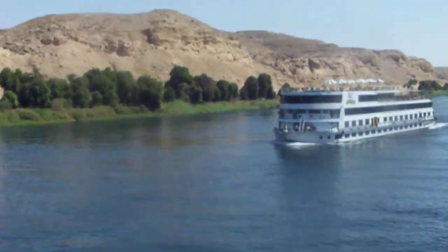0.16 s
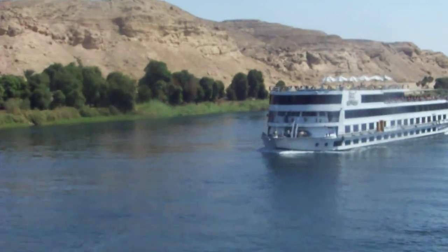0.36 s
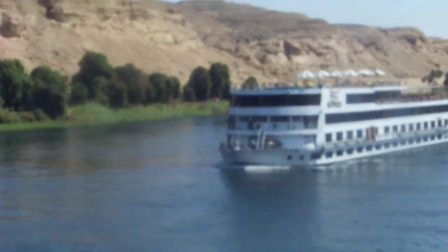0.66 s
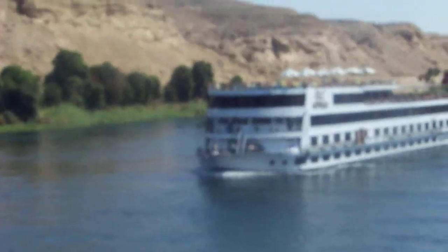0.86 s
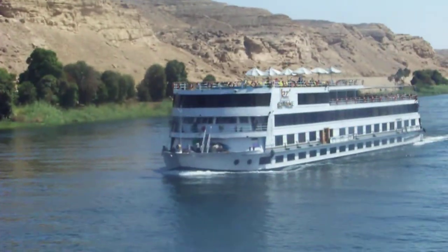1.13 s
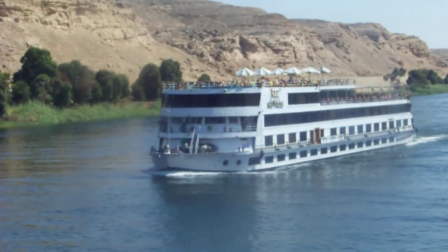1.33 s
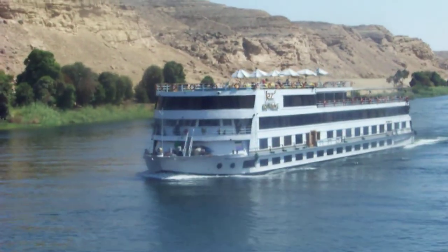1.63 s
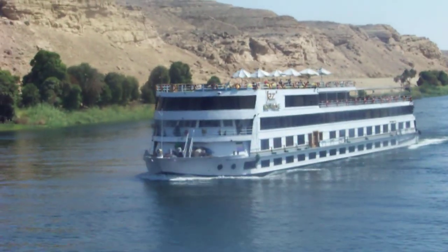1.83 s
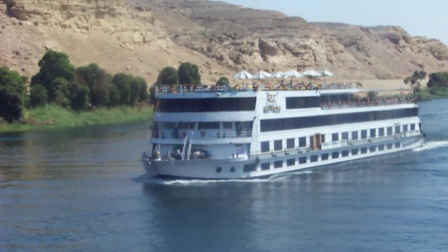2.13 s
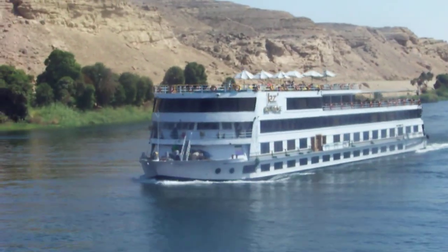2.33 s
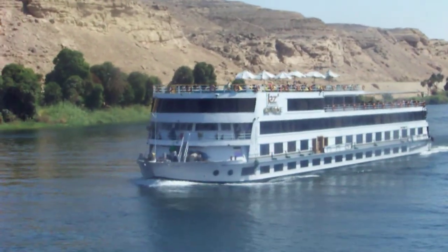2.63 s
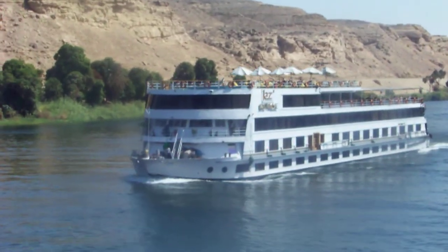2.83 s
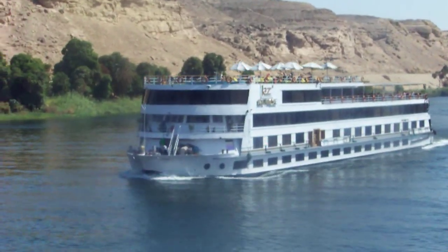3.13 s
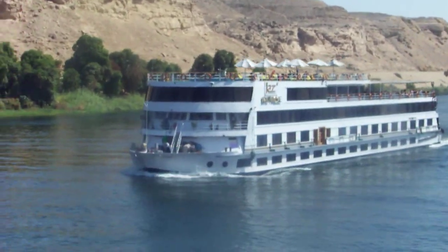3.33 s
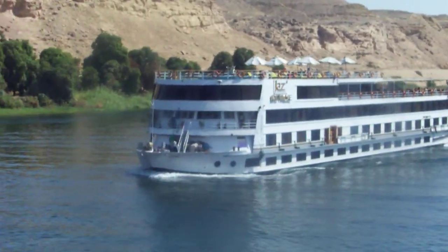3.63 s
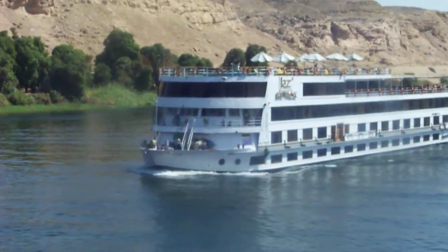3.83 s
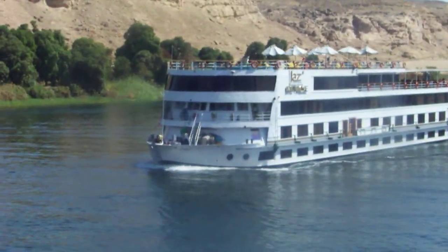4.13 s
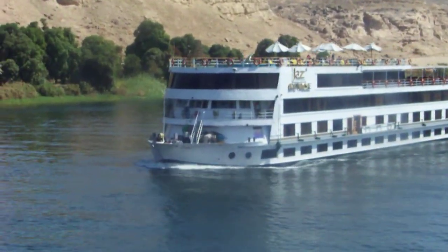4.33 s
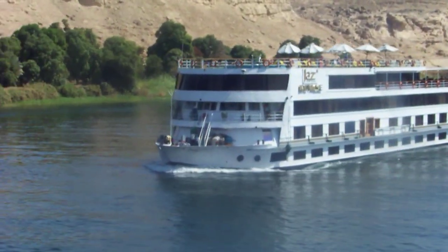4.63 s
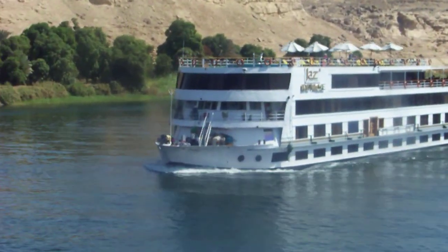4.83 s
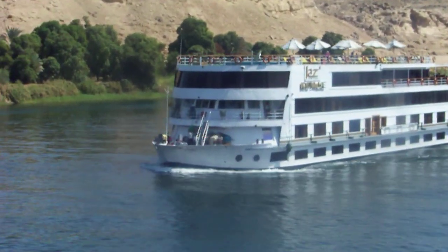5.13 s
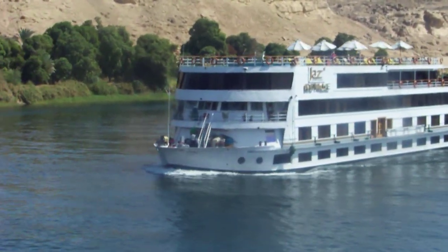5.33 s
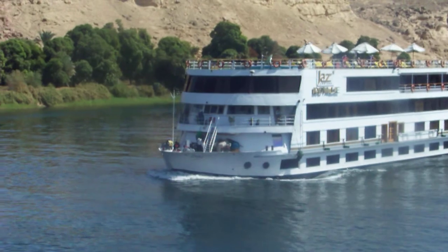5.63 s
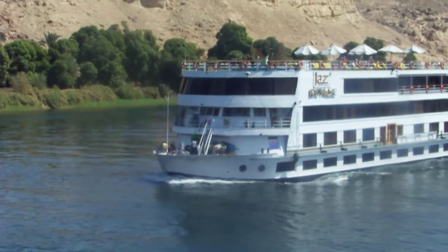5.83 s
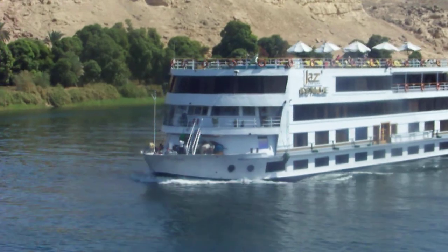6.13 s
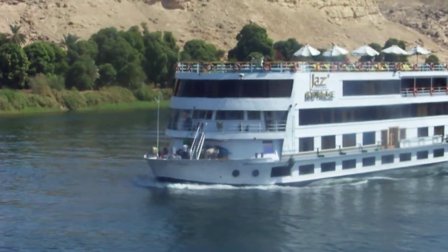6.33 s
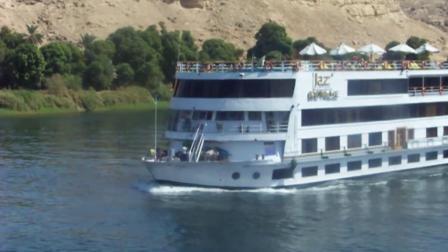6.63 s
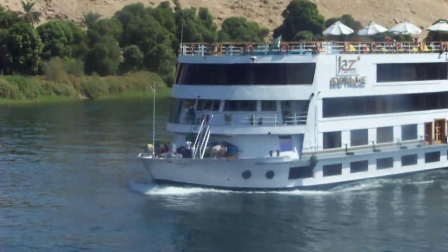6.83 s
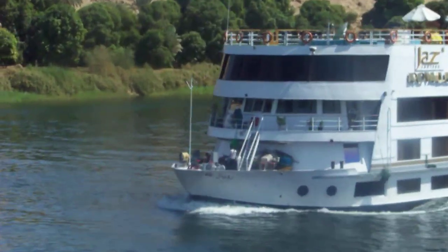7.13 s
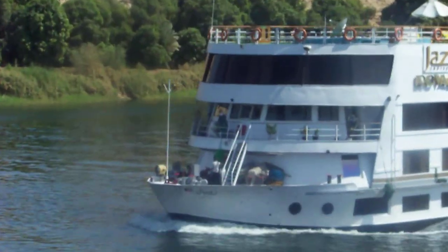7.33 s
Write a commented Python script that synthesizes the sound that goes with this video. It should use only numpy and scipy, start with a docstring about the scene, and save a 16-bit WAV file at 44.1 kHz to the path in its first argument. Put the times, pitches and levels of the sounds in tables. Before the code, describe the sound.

On the deck of a moving river boat, an unbroken rush of wake water and foam hiss covers a low engine rumble. Thin machinery whines swell and fade. About a third of the way in, the deck gives one dull thump with weaker knocks after it, then a soft wind buffet. The water slowly grows stronger and brighter. The handheld stereo microphone adds a few tiny clicks.

```python
"""A steady stereo rush of wake water and foam runs throughout, over a low engine rumble and faint machinery whines.
Shaped noise makes the water, its foam, the breaking waves and the drone; drifting sines make the hum and whines.
A near surface colours the rush with a delayed copy, whose comb climbs as the microphone turns.
A drone builds as another boat draws near. The deck thumps, with three weaker blows close behind, as ringing modes;
wind puffs on the microphone as short bass swells; its case ticks in the hand as tiny bright snaps."""
import sys
import numpy as np
from scipy import signal
from scipy.fft import rfft, irfft, next_fast_len
from scipy.io import wavfile
from scipy.ndimage import uniform_filter1d, map_coordinates

SR = 44100
rng = np.random.default_rng(int(sys.argv[2]) if len(sys.argv) > 2 else 0)


def unload_audio(sound):
    """Save the sound as a 16-bit wav file, at the path given as the first command line argument."""
    columns = np.transpose(np.atleast_2d(sound))
    # keep every value between -1 and 1, then stretch to whole-number steps
    steps = np.round(np.clip(columns, -1, 1) * 32767)
    wavfile.write(sys.argv[1], SR, steps.astype(np.int16))


N = 329868


def amp(db):
    """Decibels to gain."""
    return 10 ** (np.asarray(db) / 20)


def unit(x):
    """Scale to rms 1, over both channels together if there are two."""
    return x / np.sqrt(np.mean(x ** 2) + 1e-20)


def along(rows, hz):
    """Each column of a table, read on a log-frequency axis."""
    table_hz, *columns = np.transpose(rows)
    return np.array([np.interp(np.log(hz + 1), np.log(table_hz + 1), column) for column in columns])


def curves(rows):
    """One value per sample for each column after the time."""
    table_s, *columns = np.transpose(rows)
    return [np.interp(np.arange(N) / SR, table_s, column) for column in columns]


def wobble(rate):
    """A smooth random curve, rate knots a second."""
    knots = rng.standard_normal(int(N * rate / SR) + 4)
    return map_coordinates(knots, [np.arange(N) * rate / SR])


def filtered(x, response):
    """x shaped by a response of frequency."""
    padded = next_fast_len(N + SR // 2)
    spectrum = rfft(x, padded) * response(np.fft.rfftfreq(padded, 1 / SR))
    return irfft(spectrum, padded)[..., :N]


def lowpass(hz, edge_hz, order):
    """Gain of a smooth low-pass; around a shifted zero it becomes a band."""
    return 1 / np.sqrt(1 + (hz / edge_hz) ** (2 * order))


def since(s):
    """Seconds since the moment s, zero before it."""
    return np.maximum(np.arange(N) / SR - s, 0)


def bump(s, half_length_s):
    """A bell-shaped swell and ebb centred on the moment s."""
    return np.exp(-((since(0) - s) / half_length_s) ** 2)


def panned(db, pan_db):
    """Left and right gains whose levels differ by pan_db, left louder if positive."""
    return amp([[db + pan_db / 2], [db - pan_db / 2]])


def drift(db_per_s):
    """A steady change of level in dB, zero halfway through."""
    return db_per_s * (since(0) - N / SR / 2)


def tone(hz, width_hz):
    """An unsteady tone near rms 1 whose phase wanders faster with more width."""
    phase = 2 * np.pi * hz * since(0) + 0.75 * wobble(2 * width_hz)
    return np.sqrt(2) * np.sin(phase)


# how the two microphone ports agree: pitch_hz [Hz], likeness [0-1], left_lead_rad [radians]
PORT_LIKENESS = [(50, .99, -.7), (250, .97, -.3), (550, .96, -.1), (1100, .81, -.4), (1400, .6, -1.3),
                 (1700, .35, -1.4), (1950, .31, .2), (2350, .6, 1.6), (3000, .2, 1.1), (3500, .32, -1.1),
                 (4300, .28, -.3), (5400, .2, -1.4), (5900, .15, -3.9), (6800, .39, -3.6)]


def at_ports(pair):
    """Two unrelated noises become left and right, partly alike and shifted in phase."""
    def mixing(hz):
        alike, _ = along(PORT_LIKENESS, hz)
        turn = np.arccos(np.clip(alike, 0, 1)) / 2
        return np.array([np.cos(turn), np.sin(turn)])

    def phase_lead(hz):
        _, lead = along(PORT_LIKENESS, hz)
        return np.exp(.5j * np.outer([1, -1], lead))

    mid, side = filtered(pair, mixing)
    return filtered(np.array([mid + side, mid - side]), phase_lead)


# colour of the engine rumble, its shape only: pitch_hz [Hz], level_db [dB per Hz]
RUMBLE_COLOUR = [(12, -40.5), (25, -8.5), (45, -1), (75, 1.5), (97, -4), (125, -0.5), (170, -3), (230, -9),
                 (400, -34.5), (900, -100)]
# engine tones: pitch_hz [Hz], level_db [dB rms], width_hz [Hz]
ENGINE_TONES = [(81.2, -48.5, 5), (115.5, -51.5, 3.7)]
# rumble level halfway through (dB), and its slow rise as the other boat draws near (dB per s)
RUMBLE_DB, RUMBLE_RISE_DB_PER_S = -38, 0.18


def engines():
    """Engines running evenly through the hull: a bed of low noise and a few humming tones."""
    noise = at_ports(rng.standard_normal((2, N)))
    rumble = unit(filtered(noise, lambda hz: amp(along(RUMBLE_COLOUR, hz))))
    hum = sum(amp(db) * tone(hz, width_hz) for hz, db, width_hz in ENGINE_TONES)
    return rumble * amp(RUMBLE_DB + drift(RUMBLE_RISE_DB_PER_S)) + hum


# machinery whines by name: pitch_hz [Hz], width_hz [Hz], roughness [0-1],
# rest_db [dB, halfway through], drift_db_per_s [dB per s]
WHINE_VOICES = {"low": (717, 10, .2, -53, -1.05), "middle": (1017, 8, 0.35, -53, 1.5),
                "high": (1388, 5, 0.04, -54.5, 0)}
# the wind carries one whine closer: centre_s [s], whine [name], rise_db [dB], half_length_s [s]
WHINE_SWELLS = [(.45, "low", 7.5, 0.75), (1.45, "low", 7, 0.25), (1.82, "low", 12, 0.21),
                (3.42, "high", 11, 0.44), (4.13, "low", 11.5, 0.24), (4.15, "middle", 9, 0.25),
                (5.26, "middle", 9, 0.28), (5.55, "low", 8.5, 0.5), (7.1, "high", 10.5, 0.36)]


def machinery():
    """Thin whines, part tone and part narrow noise flutter, that swell now and then on the wind."""
    out = np.zeros(N)
    for name, (hz, width_hz, rough, rest_db, db_per_s) in WHINE_VOICES.items():
        flutter = unit(filtered(rng.standard_normal(N), lambda f: lowpass(f - hz, width_hz, order=3)))
        share = np.clip(rough, 0, 1)
        whine_sound = np.sqrt(1 - share) * tone(hz, width_hz) + np.sqrt(share) * flutter
        swell_db = sum(db * bump(s, length) for s, whine, db, length in WHINE_SWELLS if whine == name)
        level_db = rest_db + drift(db_per_s) + swell_db + .8 * wobble(10)
        out += amp(level_db) * whine_sound
    return out


# strength of the wake at the deck, used relative to its mean: time_s [s], level_db [dB]
WAKE_FLOW = [(0.05, -34), (0.48, -33.5), (1.05, -34), (1.85, -34), (2.25, -34.5), (2.69, -33), (3.63, -33),
             (3.92, -31.5), (4.22, -32), (4.6, -33), (5.27, -31.5), (5.9, -32.5), (6.35, -32), (6.7, -31),
             (7.15, -31.5), (7.4, -32)]


def flow():
    """How far the wake's strength lies above its mean, in dB; it drives rush, hiss and drone."""
    db, = curves(WAKE_FLOW)
    return db - db.mean()


# level at mean flow, halfway through (dB); growth with the flow (dB per dB)
DRONE_DB, DRONE_GROWS = -46.5, 1.4
# steady build as the other boat draws near (dB per s)
DRONE_RISE_DB_PER_S = 1.13


def drone(centre_hz, width_hz):
    """One broad resonance of the churning water, following the flow and slowly growing."""
    band = filtered(rng.standard_normal(N), lambda hz: lowpass(hz - centre_hz, width_hz / 2, order=2))
    return unit(band) * amp(DRONE_DB + DRONE_GROWS * flow() + drift(DRONE_RISE_DB_PER_S))


# puffs of wind on the ports: centre_s [s], level_db [dB], pitch_hz [Hz], half_length_s [s]
WIND_PUFFS = [(2.957, -28.5, 52, .026), (3.031, -32, 58, .016), (3.08, -39, 80, .025)]
# broken air around a puff: level against the puff (dB), upper edge (Hz), length over the puff's
EDDY_DB, EDDY_HZ, EDDY_STRETCH = -13, 130, 2.4


def puffs():
    """An eddy crosses the ports: a soft swell of a few slow cycles inside a longer patch of broken air."""
    out = np.zeros(N)
    air_band = lambda f: lowpass(f, EDDY_HZ, order=4) * (1 - lowpass(f, 25, order=3))
    for s, db, hz, length in WIND_PUFFS:
        swell = bump(s, length) * np.sin(2 * np.pi * hz * (since(0) - s))
        air = unit(filtered(rng.standard_normal(N), air_band))
        out += amp(db) * (swell + amp(EDDY_DB) * air * bump(s, EDDY_STRETCH * length))
    return out


# ticks of the case: start_s [s], level_db [dB], centre_hz [Hz], spread [octaves],
# crack_db and push_db [dB against the tick], pan_db [dB, left over right]
CASE_TICKS = [(0.6452, -13, 2950, 0.62, -14, -3, 12), (0.646, -20, 2000, .5, -10, -14, -2),
              (1.1194, -27, 7260, .5, -5, 2, -7), (4.505, -28, 5000, .8, -2, 6, 5),
              (6.2368, -25, 6900, .8, -2, 5, 2), (6.2581, -18.5, 6900, 1.0, -3, 13, -1),
              (6.2617, -29, 6000, 1.3, 0, 7, 0)]
# modes of the case: pitch_hz [Hz], level_db [dB], t60 [s]
CASE_MODES = [(1900, -4, 0.007), (2890, 1, 0.011), (4130, -2, 0.0044), (5700, -14, 0.005),
              (7300, -2, 0.0059)]
# half length of a tick's push (s)
PUSH_S = .000036


def ticks():
    """Tiny snaps of plastic: a sharp push, short case modes near the snap's own pitch, and a faint crack."""
    out = np.zeros((2, N))
    for s, db, centre_hz, spread, crack_db, push_db, pan_db in CASE_TICKS:
        t = since(s)
        ring = np.zeros(N)
        for k, (hz, level, t60) in enumerate(CASE_MODES):
            stirred = np.exp(-(np.log2(hz / centre_hz) / spread) ** 2)
            ring += (-1) ** k * stirred * amp(level - 60 * t / t60) * np.sin(2 * np.pi * hz * t)
        grit = unit(filtered(rng.standard_normal(N), lambda f: lowpass(f, 1.9 * centre_hz, order=3)))
        crack = grit * amp(crack_db - 60 * t / 0.011)
        snap = (ring + crack) * (1 - np.exp(-t / 0.0001))
        push = amp(push_db) * bump(s + .0004, PUSH_S)
        out += panned(db, pan_db) * (snap - push)
    # so small a part radiates no bass
    return filtered(out, lambda hz: 1 - lowpass(hz, 900, order=3))


# blows on the deck: start_s [s], level_db [dB], contact_softness_hz [cut-off, Hz]
DECK_BLOWS = [(2.275, -14, 225), (2.368, -30, 200), (2.43, -29.5, 600), (2.49, -34, 180)]
# modes of the deck: pitch_hz [Hz], level_db [dB], t60 [s]
DECK_MODES = [(48.6, -2.5, 0.22), (81.4, -9, 0.22), (111, 1, 0.071), (136.2, -7, 0.29), (185, -8.5, 0.14),
              (217, -9, .09), (490, 8, .08)]
# the shudder after a blow: level against the blow (dB), centre and width (Hz), t60 (s)
SHUDDER_DB, SHUDDER_HZ, SHUDDER_WIDTH_HZ, SHUDDER_T60_S = -16.5, 125, 110, 0.72


def thumps():
    """Blows ring the deck and leave it shuddering; a soft contact stirs only low modes, a hard one also knocks."""
    out = np.zeros(N)
    shudder_band = lambda hz: lowpass(hz - SHUDDER_HZ, SHUDDER_WIDTH_HZ / 2, order=4)
    for s, db, soft_hz in DECK_BLOWS:
        t = since(s)
        ring = np.zeros(N)
        # neighbouring modes move in opposite directions, so the boom builds over a few milliseconds
        for k, (hz, level, t60) in enumerate(DECK_MODES):
            ring += (-1) ** k * amp(level - 60 * t / t60) * np.sin(2 * np.pi * hz * t)
        shudder = unit(filtered(rng.standard_normal(N), shudder_band))
        boom = ring + shudder * amp(SHUDDER_DB - 60 * t / SHUDDER_T60_S)
        onset = 1 - np.exp(-t / 0.0015)
        contact = lambda hz: lowpass(hz, soft_hz, order=6) * (1 - lowpass(hz, 22, order=3))
        out += amp(db) * filtered(boom * onset, contact)
    return out


def churn(patchy_db):
    """Two noises with short patches of random gain in time and pitch, shared by both."""
    spectra = signal.stft(rng.standard_normal((2, N)), nperseg=512)[2]
    field = rng.standard_normal(spectra.shape[1:])
    field = uniform_filter1d(field, size=7, axis=0)  # smooth across pitch
    field = uniform_filter1d(field, size=14, axis=1)  # smooth across time
    return signal.istft(spectra * amp(patchy_db * unit(field)), nperseg=512)[1][:, :N]


# waves breaking in the wake: centre_s [s], level_db [dB], centre_hz [Hz], width_hz [Hz],
# half_length_s [s], pan_db [dB, left over right]
BREAKING_WAVES = [(2.95, -45, 820, 160, .4, 0), (4.1, -41, 2050, 453, 0.34, -6),
                  (5.5, -48, 410, 140, .45, 0), (6.88, -39, 3700, 1700, 0.46, 1),
                  (7.077, -39.5, 1300, 600, 0.38, -4)]


def surges():
    """A breaking wave lifts one band of the rush, swelling and ebbing, rougher than the steady water."""
    out = np.zeros((2, N))
    for s, db, centre_hz, width_hz, length, pan_db in BREAKING_WAVES:
        band = lambda hz: lowpass(hz - centre_hz, width_hz / 2, order=2)
        foam = unit(filtered(churn(patchy_db=1.0), band))
        out += panned(db, pan_db) * foam * amp(.7 * wobble(8.7)) * bump(s, length)
    return out


# colour of the rush at the ports, shape and balance only: pitch_hz [Hz], left_db and right_db [dB per Hz]
WASH_COLOUR = [(200, -8, -6), (385, -7.5, -7), (481, -2.5, -2), (603, -10.5, -4.5), (790, -3, -4),
               (1100, -5, -4), (1380, -7, -4), (1480, -11, -4.5), (1700, -9, -3.5), (1956, -10.5, -3),
               (2430, -6.5, -12), (3160, -6.5, -17), (4000, -13, -9.5), (4980, -19.5, -13.5),
               (5760, -23.5, -13.5), (6730, -23.5, -21.5)]
# level at mean flow (dB), growth with the flow (dB per dB): foam hiss answers more than the rush
RUSH_DB, RUSH_GROWS = -31.5, 0.55
HISS_DB, HISS_GROWS = -31, 1.17


def water():
    """The broad rush of the wake with its foam hiss above; more flow is louder and brighter."""
    colour = lambda hz: amp(along(WASH_COLOUR, hz)) * (1 - lowpass(hz, 145, order=4))
    wash = filtered(at_ports(churn(patchy_db=0.52)), colour)
    body = filtered(wash, lambda hz: lowpass(hz, 1653, order=6))
    foam = wash - body
    rush_db = RUSH_DB + RUSH_GROWS * flow() + 0.27 * wobble(5.8)
    hiss_db = HISS_DB + HISS_GROWS * flow() + .25 * wobble(9)
    return unit(body) * amp(rush_db) + unit(foam) * amp(hiss_db)


# the near reflection as the microphone turns: time_s [s], extra_path_m [m], level_db [dB, before its band filter]
REFLECTION_PATH = [(0, 0.35, -12), (3.8, 0.33, -10), (5.3, 0.31, -12), (6.2, 0.293, -14.5),
                   (7.48, .272, -18)]


def reflected(x):
    """A near surface adds a late copy: a comb whose teeth climb as the path shortens."""
    path_m, echo_db = curves(REFLECTION_PATH)
    late = np.arange(N) - path_m / 343 * SR  # sound travels 343 m/s
    echo = np.array([map_coordinates(side, [late]) for side in x])
    echo = filtered(echo, lambda hz: lowpass(hz, 3700, order=4) * (1 - lowpass(hz, 1700, order=3)))
    return x + amp(echo_db) * echo


def scene():
    """Everything that reaches the two ports; the left one takes more of the deep bass."""
    bass_tilt = lambda hz: amp(np.outer([1, -1], 2.3 * lowpass(hz, 70, order=2)))
    bass = filtered(engines() + thumps() + puffs(), bass_tilt)
    rush = reflected(water()) + surges() + drone(centre_hz=521, width_hz=114)
    return rush + bass + machinery() + ticks()


# highest pitch kept (Hz)
TOP_HZ = 8750


def record(dry):
    """Overall colour of the sound: two narrow hollows and a steep fall at the top."""
    def hollow(hz, centre_hz, width_hz, depth_db):
        return amp(-depth_db * np.exp(-((hz - centre_hz) / width_hz) ** 2))

    def response(hz):
        hollows = hollow(hz, 294.6, 39.5, 11.2) * hollow(hz, 976, 25.6, 8.7)
        return hollows * lowpass(hz, 7185, order=18)

    sound = filtered(dry, response)
    return filtered(sound, lambda hz: lowpass(hz, TOP_HZ, order=60))


dry = scene()
out = record(dry)
unload_audio(out)
```